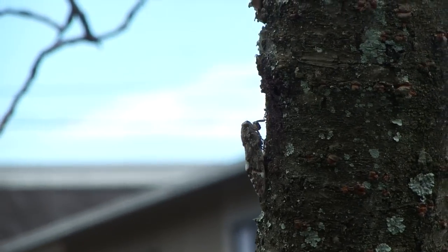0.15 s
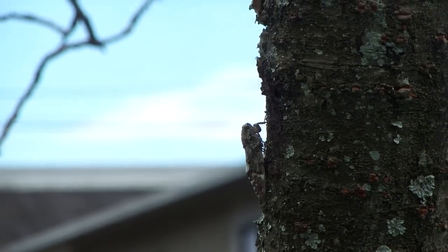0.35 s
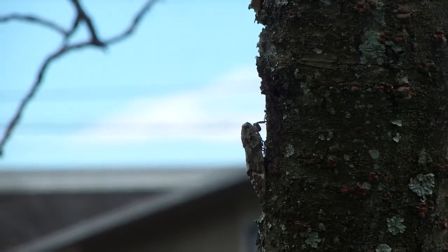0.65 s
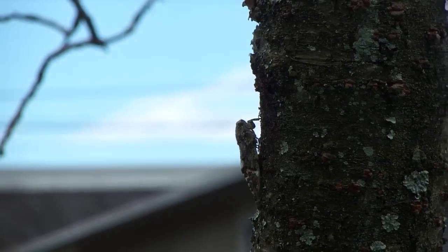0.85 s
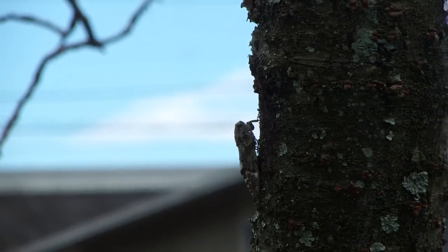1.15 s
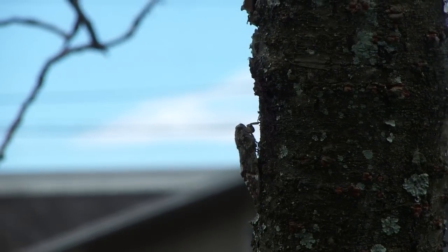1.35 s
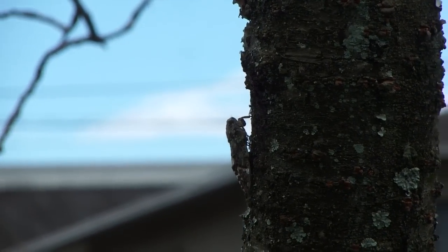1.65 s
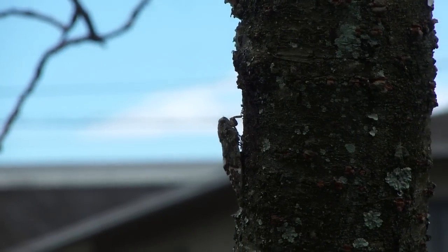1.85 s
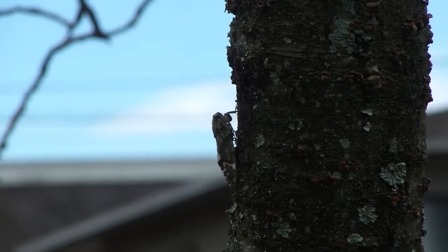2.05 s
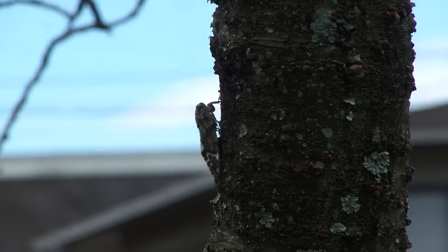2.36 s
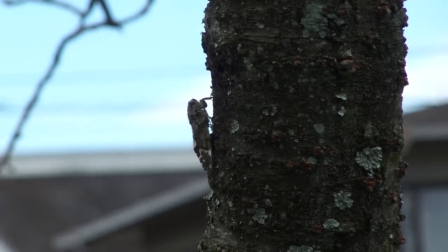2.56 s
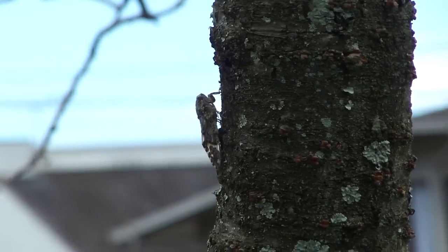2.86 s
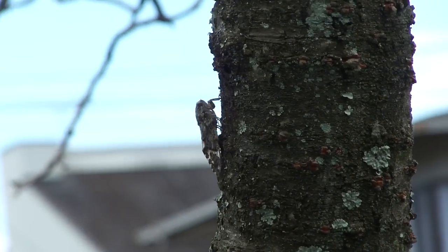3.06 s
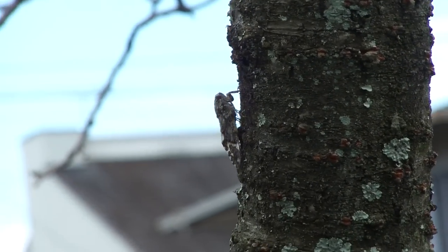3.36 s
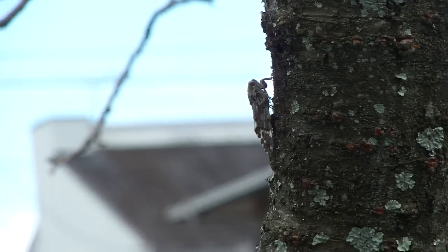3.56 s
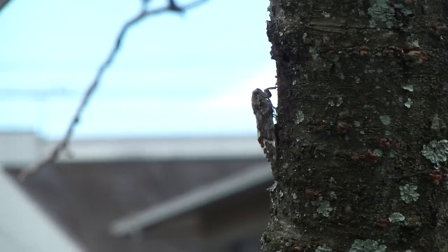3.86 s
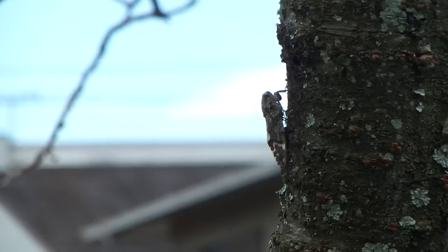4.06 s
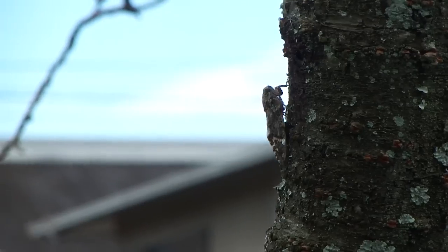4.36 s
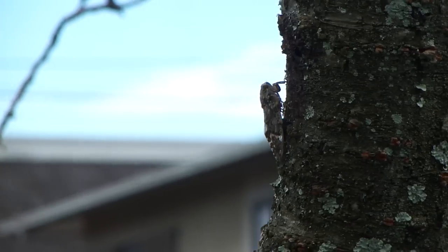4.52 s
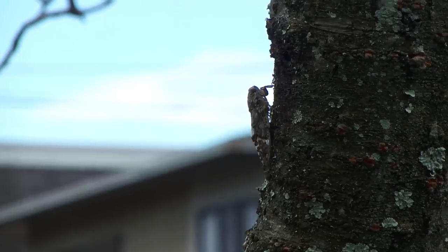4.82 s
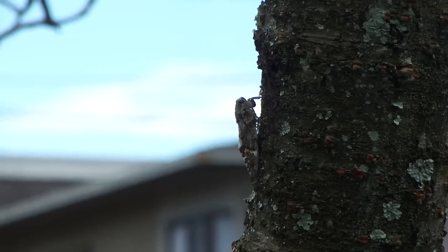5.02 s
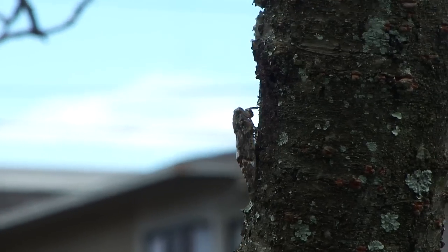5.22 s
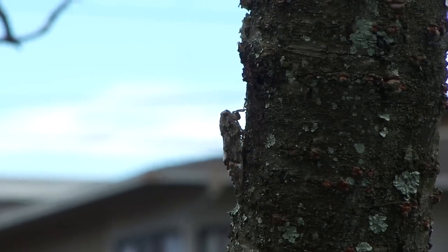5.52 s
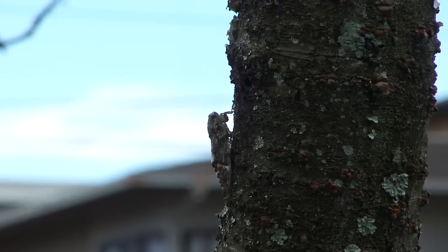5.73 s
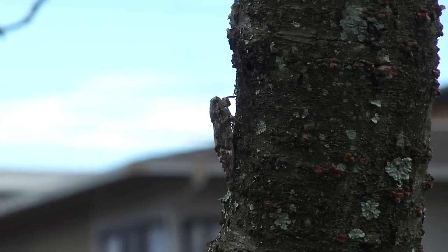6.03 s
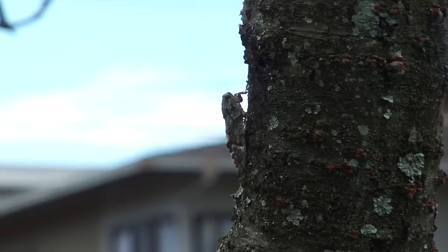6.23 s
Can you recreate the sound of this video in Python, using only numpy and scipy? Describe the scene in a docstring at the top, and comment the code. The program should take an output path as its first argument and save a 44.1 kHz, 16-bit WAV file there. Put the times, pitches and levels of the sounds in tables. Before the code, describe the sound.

Everything fades in over the first 0.3 seconds. A nearby cicada is already singing: crisp, shrill chirps around 7 kHz, roughly fifteen to sixteen per second, each lasting about 25 milliseconds and made of dry clicks that start extremely fast and slow down. The result is a pulsing, rasping buzz, nearly centred and close, with a very short faint garden reverberation. A steady soft mid-range hush, slightly stronger on the right, and a thin high hiss of far cicadas continue throughout. From 0 to about 2 seconds, breeze bumps the microphone in low, soft thuds, notably near 0.5 and 1.3 to 1.4 seconds; another gust comes at 2.7, then it is almost calm, with a tiny puff near 6.35. After 3 seconds the chirps grow shorter, with occasional slightly longer gaps, and from about 4 seconds their ring sinks slightly. The song continues right to the end at 6.4 seconds.

```python
"""A cicada sings on a tree trunk close to the microphone, in a garden among houses.
At the start all sound fades in; a steady hush and the hiss of far cicadas lie behind the song throughout.
Early on a breeze buffets the microphone in low thuds; it dies down, with only a few later gusts.
From start to end come short chirps, about 15 a second: runs of tymbal clicks that start fast and slow down.
The garden returns a faint tail; later the chirps grow shorter and sparser and their ring sinks in pitch."""
import sys
import numpy as np
from scipy import signal
from scipy.fft import rfft, irfft
from scipy.io import wavfile

SR = 44100
rng = np.random.default_rng(int(sys.argv[2]) if len(sys.argv) > 2 else 0)


def pcm_store(signal):
    """Save signal as 16-bit PCM."""
    levels = np.round(np.clip(np.atleast_2d(signal), -1, 1) * 32767)
    wavfile.write(sys.argv[1], SR, levels.astype(np.int16).T)


N = 281619
TIME = np.arange(N) / SR
BINS = np.fft.rfftfreq(N, 1 / SR)


def amp(db):
    """Decibels to gain."""
    return 10 ** (np.asarray(db) / 20)


def unit(x):
    """Scales to rms 1."""
    return x / np.sqrt(np.mean(x ** 2) + 1e-20)


def shape(points, hz):
    """Gain of a (freq_hz, level_db) table on a log-frequency axis."""
    f, db = np.transpose(points)
    return amp(np.interp(np.log(hz + 1), np.log(f), db))


def follow(curve):
    """Gain of a (time_s, level_db) curve at every sample."""
    return amp(np.interp(TIME, *np.transpose(curve)))


def add(mix, start_s, sound):
    """Mixes a sound in at a start time."""
    part = mix[..., max(round(start_s * SR), 0):][..., :sound.shape[-1]]
    part += sound[..., :part.shape[-1]]


def sides(left_db):
    """Left and right gains for a level difference."""
    return amp(np.array([[left_db], [-left_db]]) / 2)


def noise_pair(points, likeness):
    """Coloured noise at two microphone ports with a given correlation between them."""
    a, b = rfft(rng.standard_normal((2, N)))
    c = np.clip(likeness, -1, 1)
    ports = np.array([a, c * a + np.sqrt(1 - c ** 2) * b])
    return unit(irfft(ports * shape(points, BINS), N))


def drift(rate_hz):
    """Random wander of rms 1, no faster than about rate_hz."""
    slow = np.exp(-(BINS / rate_hz) ** 2) * (BINS > 0)
    return unit(irfft(rfft(rng.standard_normal(N)) * slow, N))


# spectrum of the steady outdoor hush: freq_hz, level_db (relative, per Hz)
HUSH_SPECTRUM = [(30, -44), (70, -24.5), (130, -16), (250, -8.5), (430, 1), (620, -1), (900, 0),
                 (1500, -2.5), (2000, -6), (2500, -15), (3200, -24.5), (4600, -20.5), (7000, -60)]
# the hush is louder on the right in the low range: freq_hz, left_minus_right_db
HUSH_BALANCE = [(100, -7.5), (300, -4), (620, -3), (1100, -2), (2000, 0), (3500, 0.5)]
# spectrum of the far cicadas: freq_hz, level_db (relative, per Hz)
CHORUS_SPECTRUM = [(3500, -28), (4700, -32), (5400, -0.5), (6000, 5.5), (7000, 3.5), (8500, 2),
                   (10000, -4.5), (10900, -7.5), (11400, -19), (12000, -52)]


def outdoors(hush_db=-35.5, chorus_db=-46.5, spacing_m=0.021, likeness=0.87):
    """Sound from all round: the two ports agree less as the wavelength nears their spacing."""
    diffuse = likeness * np.sinc(2 * BINS * spacing_m / 343)
    hush = noise_pair(HUSH_SPECTRUM, diffuse / (1 + (BINS / 3000) ** 3))
    left = np.sqrt(shape(HUSH_BALANCE, BINS))
    hush = irfft(rfft(hush) * np.array([left, 1 / left]), N)
    hush *= amp(hush_db + 0.34 * drift(1.0))
    chorus = amp(chorus_db + 1.2 * drift(36)) * noise_pair(CHORUS_SPECTRUM, diffuse)
    return hush + chorus


# spectrum of soft wind at the microphone: freq_hz, level_db (relative, per Hz)
WIND_SPECTRUM = [(25, -40), (50, -30), (85, -10), (140, -2), (230, 0.5), (330, -4), (480, -18.5),
                 (700, -25.5), (1300, -47), (2600, -70)]
# light breeze under the gusts, before the flutter: time_s, level_db
BREEZE_CURVE = [(0, -28), (.65, -45.5), (1.9, -40), (2.15, -48), (3, -52.5), (3.8, -68), (4.5, -56.5),
                (6.39, -56.5)]
# gusts, long ones and single buffets, before the flutter: peak_s, half_width_s, level_db
GUST_LIST = [(.1, .09, -29), (.259, 0.0062, -25), (0.343, 0.0061, -21.5), (.425, .035, -26),
             (.508, 0.0057, -18), (.662, 0.0063, -29), (.938, .01, -27.5), (1.036, 0.0095, -30.5),
             (1.143, 0.0094, -32.5), (1.302, .007, -21.5), (1.354, 0.017, -17.5), (1.426, .016, -20.5),
             (1.59, 0.075, -36.5), (1.784, 0.0066, -26), (1.951, .015, -31), (2.68, 0.039, -24),
             (6.36, .01, -37)]


def wind(likeness=-0.54, lumps_db=4.0, lumps_hz=36, bright_at_db=-21, stretch=1.55):
    """Eddies push the two ports mostly in opposite directions: low thuds over a flutter, brighter when strong."""
    power = follow(BREEZE_CURVE) ** 2
    for peak_s, half_width_s, level_db in GUST_LIST:
        power += amp(level_db) ** 2 * np.exp(-((TIME - peak_s) / half_width_s) ** 2)
    power *= amp(lumps_db * drift(lumps_hz)) ** 2
    fast = power / (power + amp(bright_at_db) ** 2)  # share of the brighter noise
    soft = noise_pair(WIND_SPECTRUM, likeness)
    hard = noise_pair([(hz * stretch, db) for hz, db in WIND_SPECTRUM], likeness)
    blend = np.sqrt(1 - fast) * soft + np.sqrt(fast) * hard
    return np.sqrt(power) * blend * sides(-2.5)


def garden(x, t60_s=0.11, onset_s=0.0045):
    """Scattered reflections from branches, ground and walls, different at each port."""
    t = TIME[:SR // 2]
    tail = rng.standard_normal((2, len(t))) * amp(-60 * t / t60_s) * (1 - np.exp(-t / onset_s))
    tail /= np.linalg.norm(tail, axis=1, keepdims=True)
    return signal.fftconvolve(x[None], tail, axes=1)[:, :N]


# one click through the tymbal and the hollow abdomen, for a ring centred on RING_HZ: freq_hz, level_db
CLICK_SPECTRUM = [(2200, -34.5), (4600, -27.5), (5500, -20), (5950, -10.5), (6550, 0), (7180, 1.5),
                  (7560, -5), (8000, -3), (8500, -19), (9100, -10), (9550, -17), (10000, -8),
                  (10800, -18.5), (11500, -34), (12000, -53)]
RING_HZ = 7010


def click(stretch, upper_lag_s=0.00046, upper_hz=8600, size=1024):
    """One tymbal buckle: the ring of the body, scaled by stretch; its upper band sounds a little later."""
    hz = abs(np.fft.fftfreq(size, 1 / SR))
    # minimum phase: the click starts abruptly and rings out
    ring = np.exp(np.conj(signal.hilbert(np.log(shape(CLICK_SPECTRUM, hz / stretch)))))[:size // 2 + 1]
    lag = upper_lag_s * (1 + np.tanh((hz[:len(ring)] - upper_hz) / 400)) / 2
    snap = irfft(ring * np.exp(-2j * np.pi * np.cumsum(lag) * SR / size))
    return np.roll(snap, size // 16)[:size // 4] * signal.windows.tukey(size // 4, .3)


def click_times(length_s, first_gap_s=.002, slowing_s=.0046, curve=3.3, jitter=0.037, last_gap_s=0.0037):
    """Clicks come about 500 a second, slow down as the muscle lets go, and end on a late straggler."""
    times = [0.]
    for luck in rng.standard_normal(40):
        phase = times[-1] / length_s
        gap = first_gap_s + slowing_s * phase ** curve
        after = times[-1] + gap * np.exp(jitter * (.5 + 2 * phase) * luck)
        if after > length_s - last_gap_s:
            break
        times.append(after)
    return np.array(times + [length_s])


def rebound(x, delay_s=.00165, share=0.51, centre_hz=7100, width_hz=950):
    """Each click comes again, weaker, only in the band where the abdomen rings; this combs the shrill peak."""
    hz = np.fft.rfftfreq(x.shape[-1], 1 / SR)
    band = share * np.exp(-((hz - centre_hz) / width_hz) ** 4)
    again = band * np.exp(-2j * np.pi * hz * delay_s)
    return irfft(rfft(x) * (1 + again), x.shape[-1])


def chirp(length_s, level_db, swell_db, ring_hz, uneven_db=0.5, sag_db=-1.5, detune=0.0051,
          rib_db=-9.5, rib_spread_s=.0019, rib_wander=0.46, last_db=-2.0, count=3):
    """A run of clicks, each a little different; lesser ribs snap around each and reach the ports unequally."""
    times = click_times(length_s)
    phase = times / length_s
    strength, pitch = rng.standard_normal((2, 42))[:, :len(times)]
    rib_times = rib_spread_s * rng.random((42, count))
    rib_sizes = amp(rib_db) * (1 + rib_wander * rng.standard_normal((42, count, 2, 1)))
    force_db = uneven_db * strength + sag_db * phase
    force_db += (swell_db + 2.5) * np.exp(-((phase - .45) / 0.55) ** 2)
    force_db[-1] += last_db
    out = np.zeros((2, round(length_s * SR) + 512))
    for start_s, db, p, offsets, sizes in zip(times, force_db, pitch, rib_times, rib_sizes):
        snap = amp(db) * click(ring_hz / RING_HZ + detune * p)
        add(out, start_s + rib_spread_s / 3, snap)
        for offset, rib in zip(offsets, sizes):
            add(out, start_s + offset, rib * snap)
    out = rebound(out)
    rms = np.sqrt(np.sum(out.mean(0) ** 2) / (length_s * SR))
    return amp(level_db) * out / rms


# swell at the usual level, added per dB above it, change over time, scatter
SWELL_DB, SWELL_PER_DB, SWELL_DB_PER_S, SWELL_SCATTER_DB = 1.6, 2.1, -.55, 0.3
USUAL_DB = -28.5  # level of an ordinary chirp


def swell(start_s, level_db):
    """dB of swell in mid-chirp: more in strong chirps, less as the song goes on."""
    steady = SWELL_DB + SWELL_PER_DB * (level_db - USUAL_DB) + SWELL_DB_PER_S * start_s
    return steady + SWELL_SCATTER_DB * rng.standard_normal()


# one row a chirp, before the gain of the song: start_s, length_s, level_db
CHIRP_LIST = [(0.003, 0.013, -29), (0.058, 0.027, -28.5), (0.117, 0.025, -26.5), (0.167, 0.032, -28),
              (0.226, 0.029, -28.5), (0.294, 0.026, -28.5), (0.353, 0.038, -29), (0.411, 0.022, -27.5),
              (0.482, 0.023, -28.5), (0.552, 0.025, -29.5), (0.609, 0.025, -28.0), (0.67, 0.025, -29),
              (0.72, 0.031, -28.0), (0.782, 0.025, -28.5), (0.839, 0.018, -26), (0.898, 0.024, -28.5),
              (0.955, 0.025, -28.5), (1.001, 0.03, -29), (1.065, 0.019, -26.5), (1.127, 0.025, -28.5),
              (1.183, 0.031, -28.5), (1.246, 0.026, -28), (1.309, 0.03, -29.5), (1.376, 0.022, -29.5),
              (1.44, 0.022, -28.5), (1.507, 0.019, -28), (1.567, 0.027, -29.5), (1.638, 0.025, -29),
              (1.705, 0.023, -29.0), (1.76, 0.024, -27.5), (1.821, 0.025, -28.5), (1.885, 0.029, -29),
              (1.948, 0.024, -28.5), (2.013, 0.026, -27), (2.079, 0.026, -30), (2.153, 0.026, -29),
              (2.209, 0.028, -28.5), (2.278, 0.026, -30), (2.347, 0.024, -30.0), (2.412, 0.023, -30),
              (2.496, 0.022, -29), (2.554, 0.027, -28.5), (2.613, 0.022, -28.5), (2.676, 0.026, -31.0),
              (2.749, 0.027, -28.5), (2.814, 0.023, -29.0), (2.875, 0.022, -28.5), (2.936, 0.026, -30.5),
              (3.005, 0.02, -28), (3.092, 0.022, -31.5), (3.155, 0.023, -30), (3.218, 0.02, -31.0),
              (3.299, 0.022, -31), (3.356, 0.024, -29.5), (3.428, 0.018, -28.5), (3.497, 0.021, -29),
              (3.569, 0.02, -30.0), (3.627, 0.021, -29.5), (3.695, 0.023, -31.5), (3.764, 0.021, -31.0),
              (3.832, 0.027, -32.5), (3.888, 0.026, -30.5), (3.997, 0.02, -30), (4.056, 0.025, -31),
              (4.123, 0.023, -29.5), (4.193, 0.022, -30), (4.256, 0.025, -29), (4.326, 0.021, -28.5),
              (4.391, 0.02, -29), (4.505, 0.039, -27), (4.572, 0.024, -29), (4.643, 0.022, -27.5),
              (4.711, 0.02, -28.0), (4.778, 0.019, -28), (4.855, 0.016, -26.5), (4.92, 0.02, -28.5),
              (4.981, 0.025, -29.5), (5.055, 0.023, -28.0), (5.136, 0.023, -29.5), (5.206, 0.021, -28),
              (5.3, 0.017, -28.0), (5.377, 0.016, -27.5), (5.436, 0.024, -29.5), (5.505, 0.021, -27.5),
              (5.577, 0.021, -29), (5.695, 0.016, -28.5), (5.76, 0.02, -27.0), (5.831, 0.023, -29.0),
              (5.944, 0.024, -29.0), (6.013, 0.017, -28), (6.079, 0.026, -30.0), (6.16, 0.02, -29),
              (6.233, 0.024, -29), (6.304, 0.015, -27)]
# ring of the abdomen, sinking in the second half of the song: time_s, centre_hz
RING_CURVE = [(0, 6980), (2.7, 6990), (3.4, 7070), (4.2, 6940), (4.7, 6950), (5.2, 6880), (6.39, 6850)]
RING_SCATTER_HZ = 35  # each chirp rings a little higher or lower


def cicada(gain_db=0.23, wet_db=-17, lead_s=4.5e-6, top_left_db=-3, top_turn_rad=0.91, build_up_s=.0018):
    """Chirps arrive from nearly straight ahead; their top band favours the right port and reaches it first."""
    song = np.zeros((2, N))
    for start_s, length_s, level_db in CHIRP_LIST:
        ring_hz = np.interp(start_s, *np.transpose(RING_CURVE)) + RING_SCATTER_HZ * rng.standard_normal()
        sound = chirp(length_s, level_db, swell(start_s, level_db), ring_hz)
        add(song, start_s - build_up_s, sound)
    top = np.clip((BINS - 8300) / 1500, 0, 1)
    turn = np.pi * BINS * lead_s - top_turn_rad * top / 2
    port = amp(top_left_db * top / 2) * np.exp(1j * turn)
    direct = irfft(rfft(song) * np.array([port, 1 / port]), N)
    return amp(gain_db) * direct + amp(wet_db) * garden(song.mean(0))


def scene():
    """Cicada, background and wind."""
    return cicada() + outdoors() + wind()


# the whole sound fades in at the start: time_s, level_db
FADE_CURVE = [(0, -6.5), (.12, -6), (.25, 0), (.45, 1)]
# narrow dips in the recorder's response: centre_hz, width_hz, depth (0-1)
RESPONSE_DIPS = [(2987, 166, 0.95), (4020, 465, 0.93), (5020, 450, 0.8)]
EDGE_HZ = 12300  # upper band limit


def record(dry):
    """The sound fades in and three narrow dips colour it; then the band limit."""
    colour = np.ones(len(BINS))
    for centre_hz, width_hz, depth in RESPONSE_DIPS:
        colour *= 1 - depth / (1 + (2 * (BINS - centre_hz) / width_hz) ** 2)
    heard = irfft(rfft(dry * follow(FADE_CURVE)) * colour, N)
    low_pass = signal.firwin(255, EDGE_HZ, window=("kaiser", 8), fs=SR)
    return signal.oaconvolve(heard, low_pass[None], "same")


dry = scene()
out = record(dry)
pcm_store(out)
```